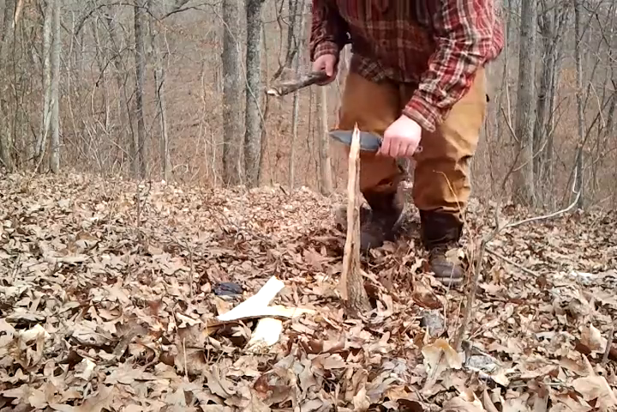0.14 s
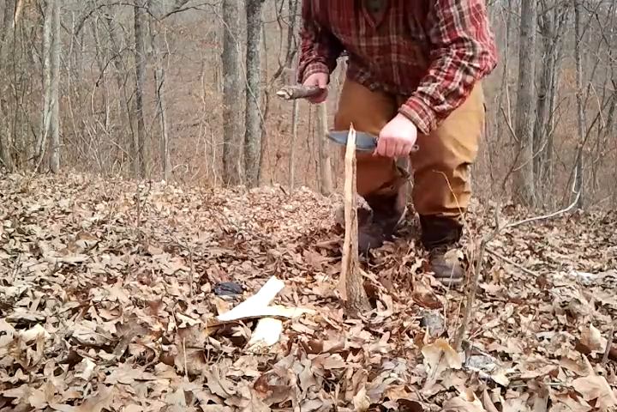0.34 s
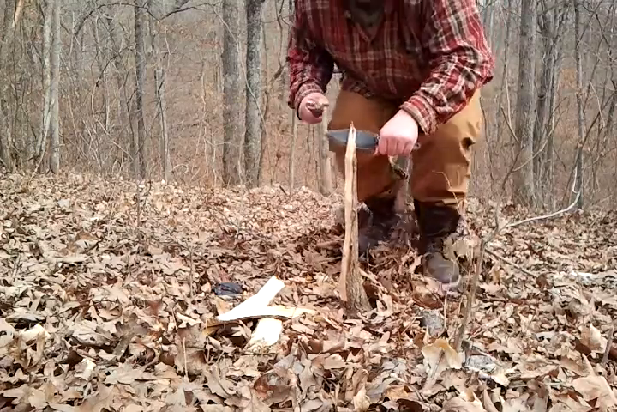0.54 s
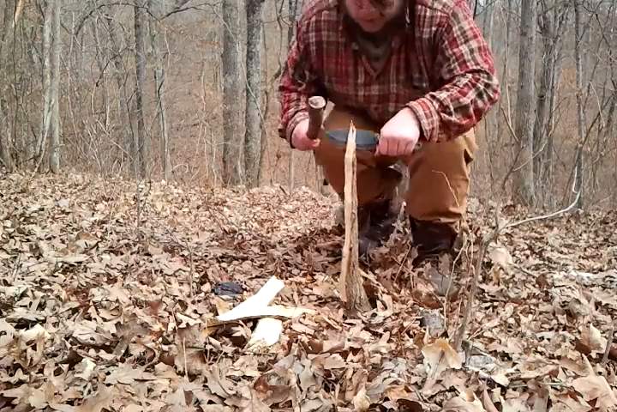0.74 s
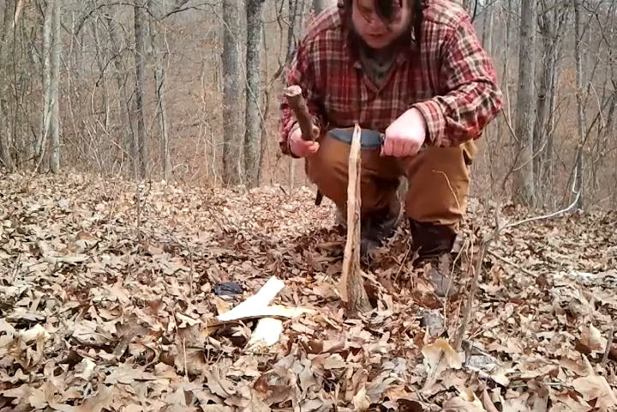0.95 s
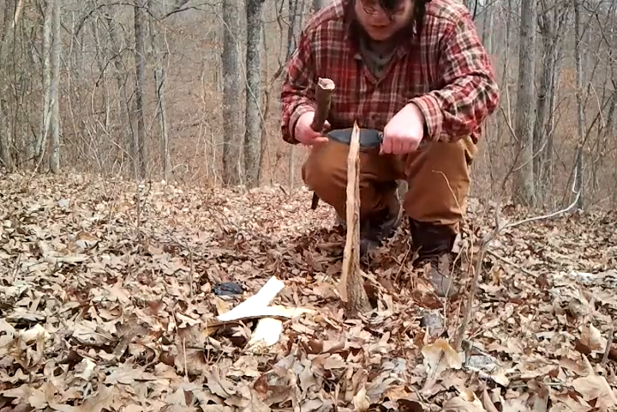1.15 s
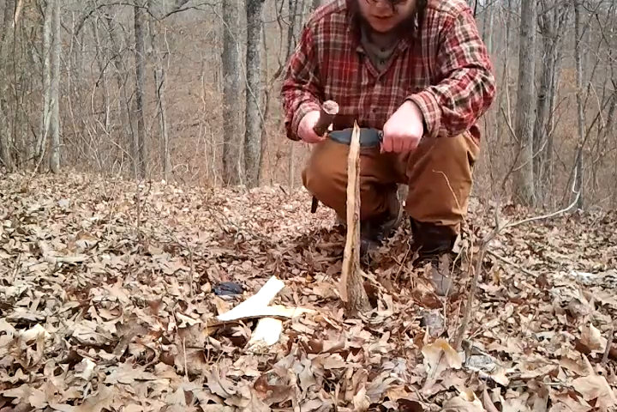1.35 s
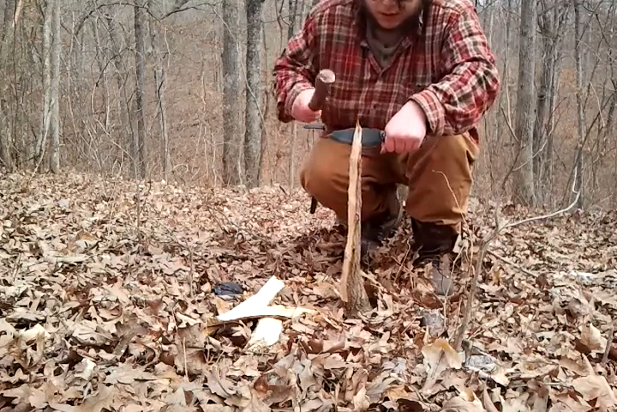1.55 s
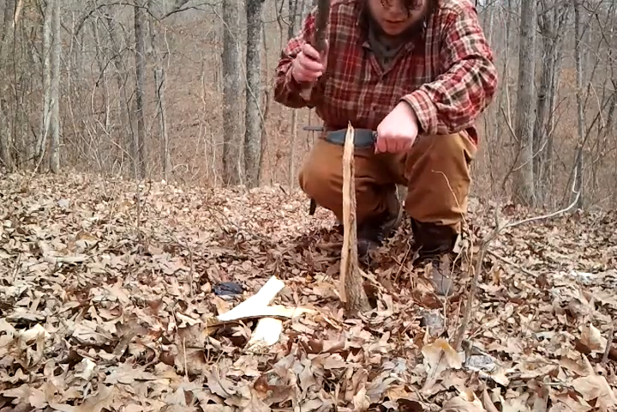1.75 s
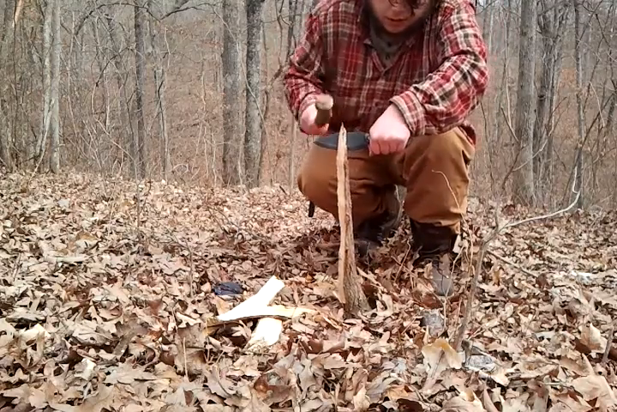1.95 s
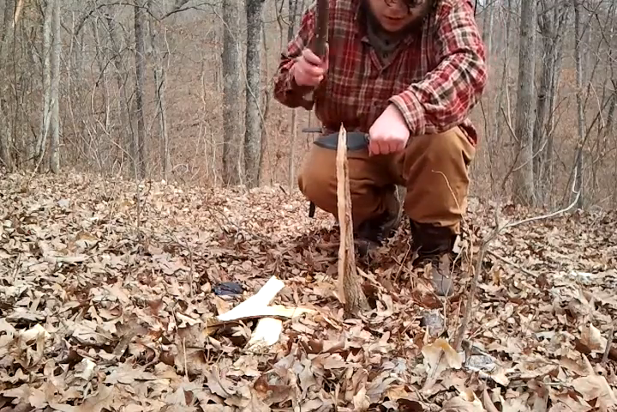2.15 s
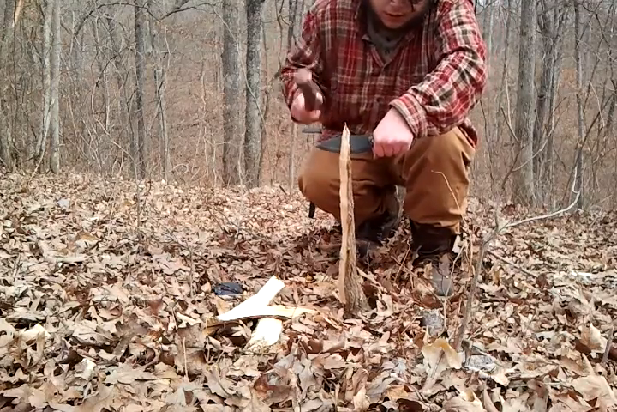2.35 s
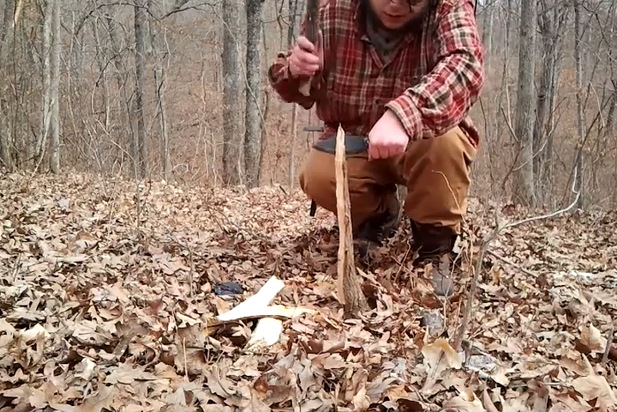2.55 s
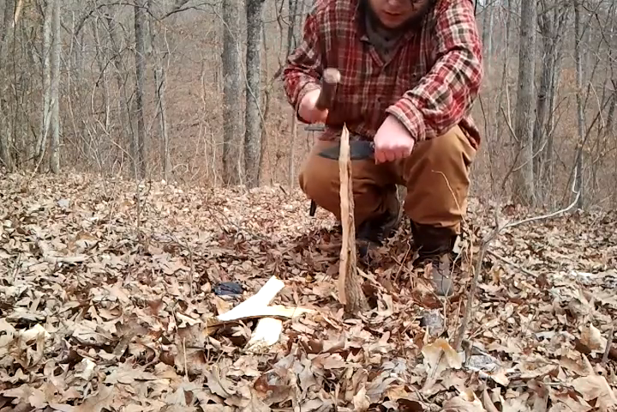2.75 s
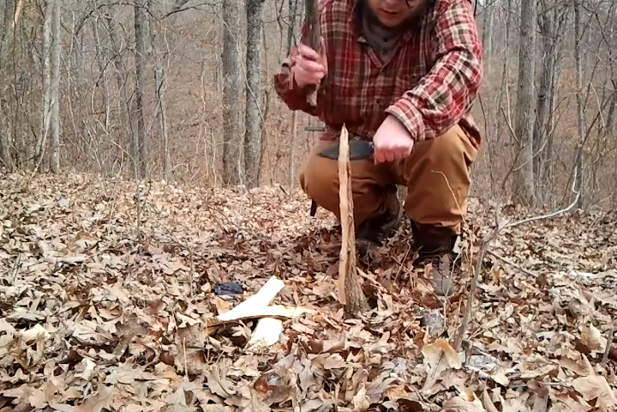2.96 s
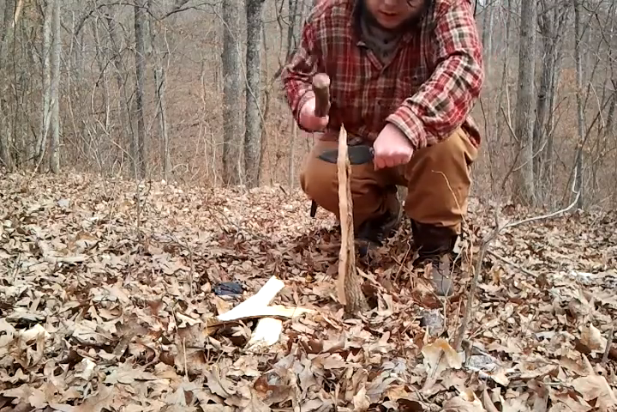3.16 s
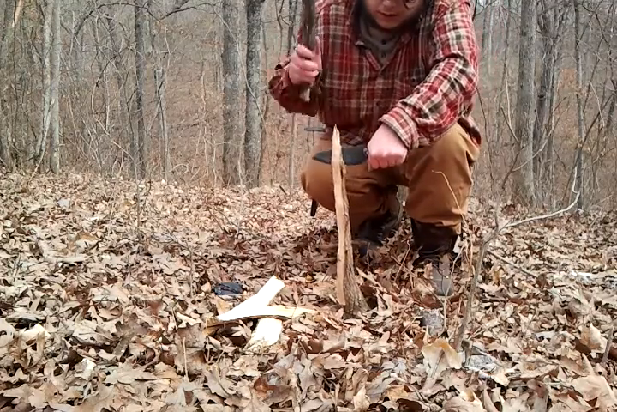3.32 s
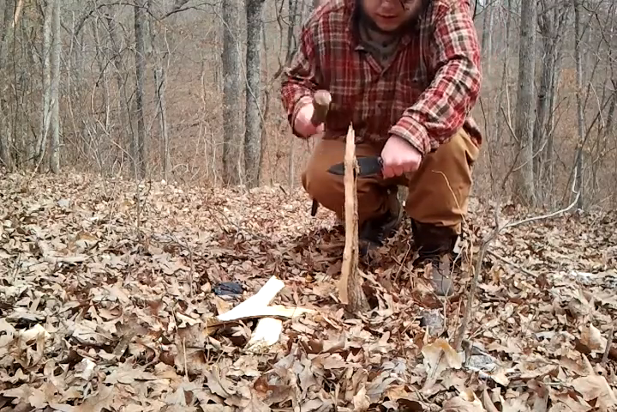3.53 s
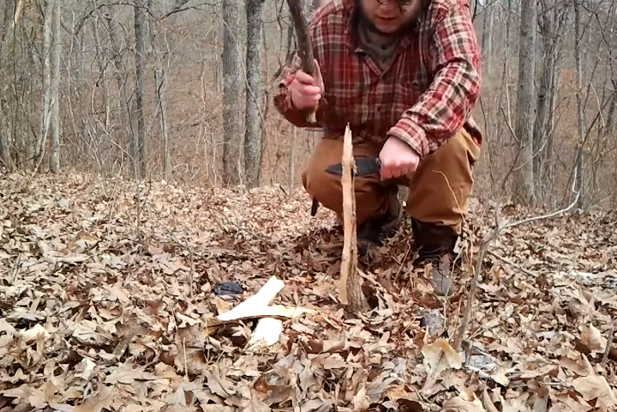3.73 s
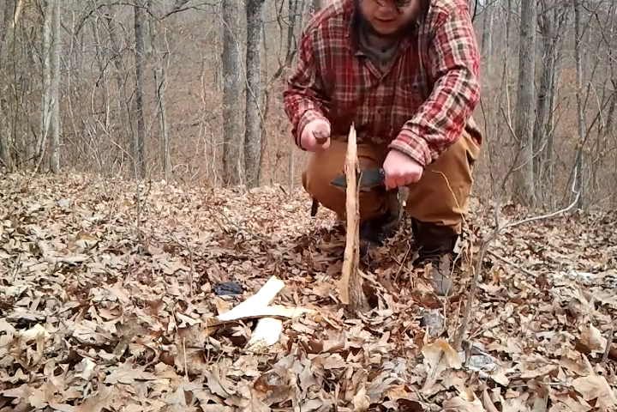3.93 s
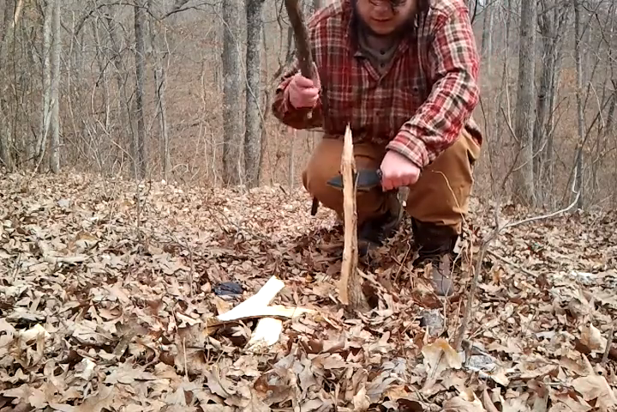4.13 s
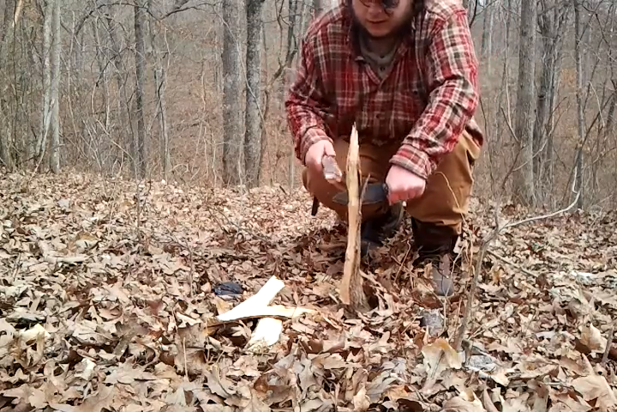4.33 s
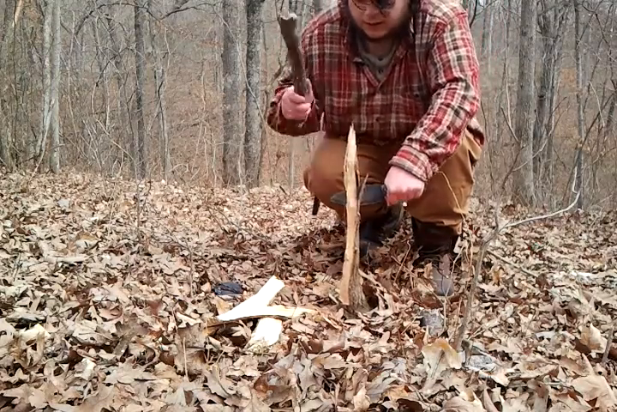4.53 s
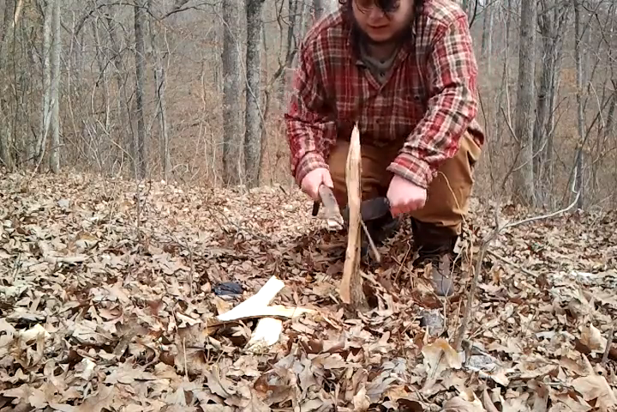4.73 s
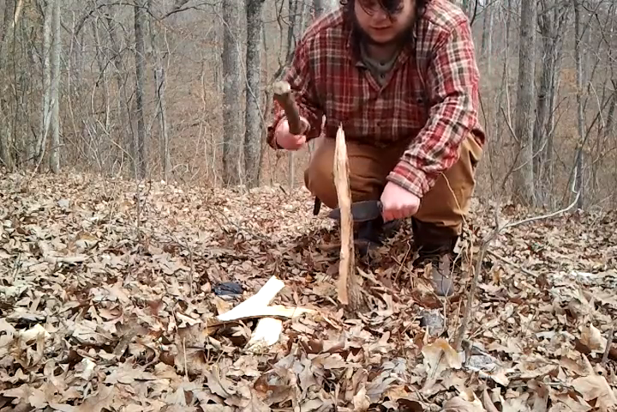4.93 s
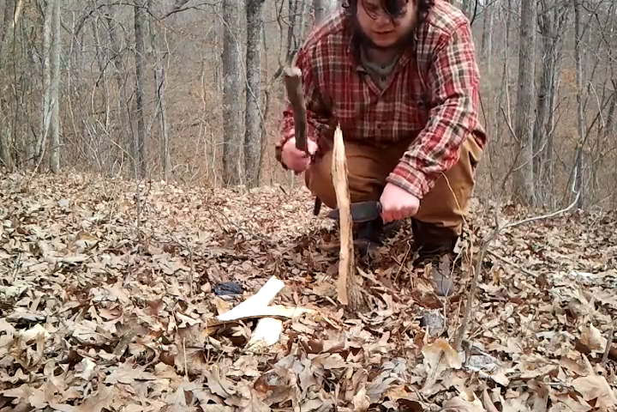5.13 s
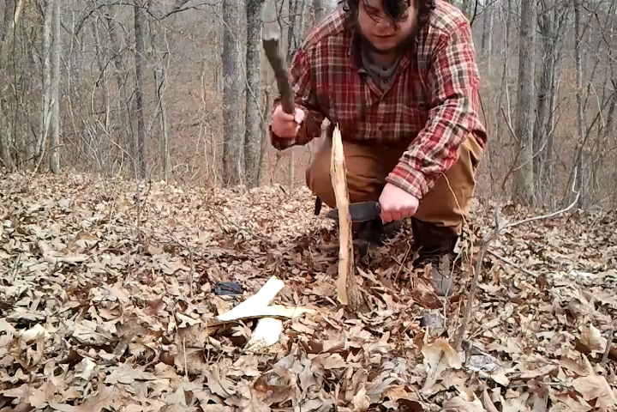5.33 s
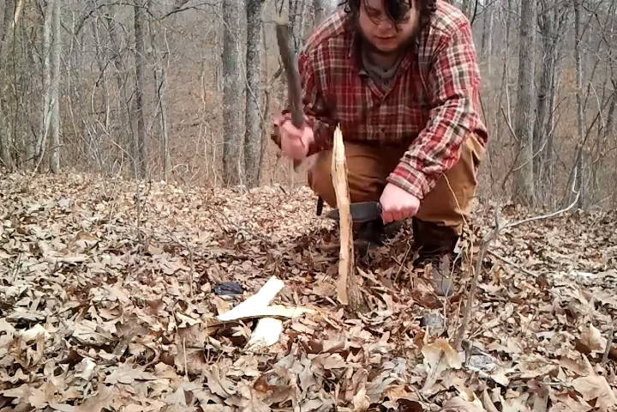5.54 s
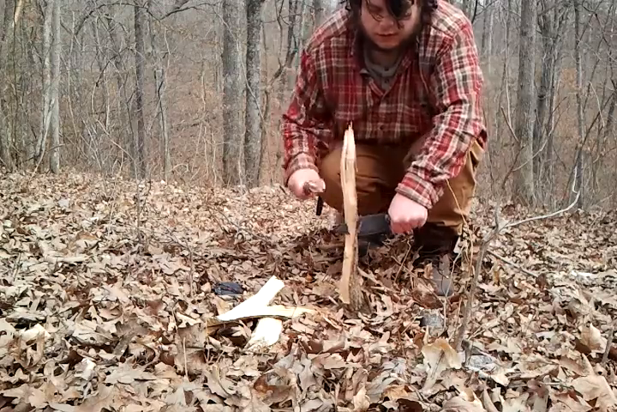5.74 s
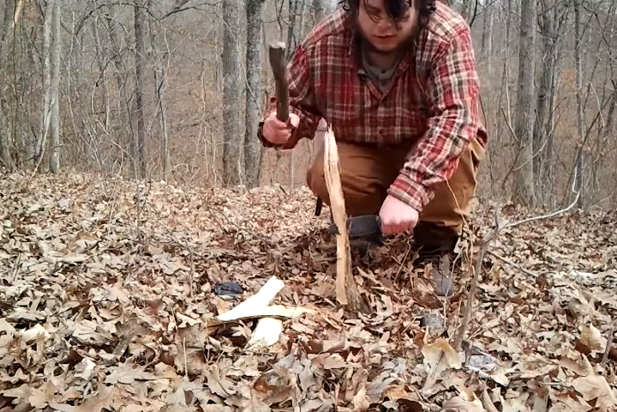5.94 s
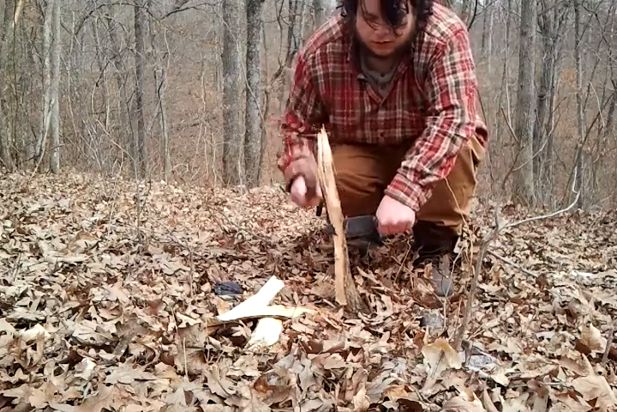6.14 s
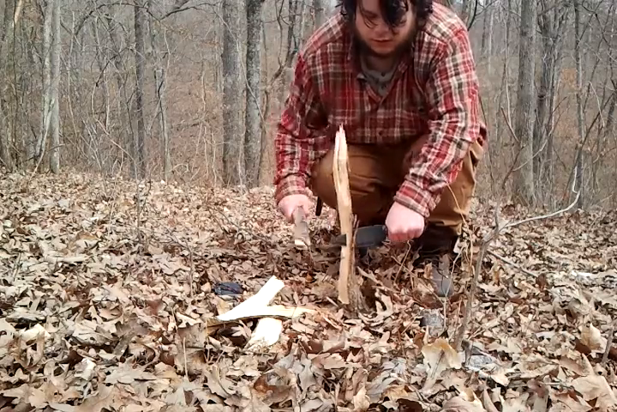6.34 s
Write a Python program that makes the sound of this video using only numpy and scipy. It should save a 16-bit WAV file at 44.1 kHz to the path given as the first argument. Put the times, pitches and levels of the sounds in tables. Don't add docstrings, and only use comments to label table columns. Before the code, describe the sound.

Brittle leaves rustle and snap underfoot, followed by loud, clipped woody knocks at a steady pace, the last ones slower, bouncing and softer.

```python
import sys
import numpy as np
from scipy import signal
from scipy.io import wavfile
from scipy.ndimage import uniform_filter1d, minimum_filter1d

SR = 44100
rng = np.random.default_rng(int(sys.argv[2]) if len(sys.argv) > 2 else 0)


def digitize_waveform(pressure):
    field = np.atleast_2d(pressure).T
    bounded = np.clip(field, -1, 1)
    quanta = np.round(bounded * 32767).astype(np.int16)
    wavfile.write(sys.argv[1], SR, quanta)


def undo_db(level):
    steps = np.asarray(level, float) / 20
    return 10 ** steps


N = 285768


def evened(x):
    return x / np.sqrt(np.mean(x ** 2) + 1e-20)


def read(points, hz):
    f, value = np.transpose(points)
    return np.interp(np.log(hz + 1), np.log(f + 1), value)


def add(mix, start_s, sound):
    part = mix[round(start_s * SR):][:len(sound)]
    part += sound[:len(part)]


def passed(x, kind, hz, order=2):
    return signal.sosfilt(signal.butter(order, hz, kind, fs=SR, output="sos"), x)


def swell(start_s, level_db, rise_db_per_s, fall_db_per_s, until_s=None):
    t = np.arange(N) / SR
    early = np.maximum(start_s - t, 0)
    late = np.maximum(t - (until_s or start_s), 0)
    return undo_db(level_db - rise_db_per_s * early - fall_db_per_s * late)


def random_signs():
    return rng.choice([-1., 1.], N)


# pitch_hz [Hz], level_db [dB per Hz]
HUSH_COLOUR = [(120, -40.5), (200, -9), (310, -5.5), (341, -6.5), (428, -6.5), (472, -10.5), (537, -4.5),
               (2800, -12.5), (3520, -12.5), (5360, -10), (7900, -20.5), (9600, -67), (12500, -87),
               (21100, -120)]
# start_s [s], level_db [dB]
FOOT_PUFFS = [
    (.07, -65),
    (.25, -63),
    (0.849, -48.5),
    (1.01, -76),
    (1.22, -61),
    (1.31, -57),
    (1.55, -71),
]


def air():
    frames, hz = N // 256 + 5, np.fft.rfftfreq(1024, 1 / SR)
    a, b, patches = rng.standard_normal((frames, 513, 3)).T
    patches = evened(uniform_filter1d(uniform_filter1d(patches, 20, 0), 10, 1))
    spectrum = (a + 1j * b) * undo_db(read(HUSH_COLOUR, hz)[:, None] + 1.37 * patches)
    hush = signal.istft(spectrum, nperseg=1024, noverlap=768)[1][:N]

    lumps = undo_db(2.0 * evened(passed(rng.standard_normal(N), "low", 14)))
    breeze = evened(lumps * passed(passed(rng.standard_normal(N), "low", 130), "high", 62))
    gusts = undo_db(-65.5) + sum(swell(start_s, level_db, 345, 176.5) for start_s, level_db in FOOT_PUFFS)

    drone_hz, drone_width_hz = 163, 19
    drone_band = [drone_hz - drone_width_hz / 2, drone_hz + drone_width_hz / 2]
    drone = evened(passed(rng.standard_normal(N), "band", drone_band))
    passing = swell(4.36, -67.5, 85, 147, until_s=5.8)
    return undo_db(-57) * evened(hush) + gusts * breeze + passing * drone


def settling():
    ticks_per_s, level_db = 250, -57
    size = undo_db(3.3 * np.minimum(rng.exponential(1, N), 4)) * (rng.random(N) < ticks_per_s / SR)
    return undo_db(level_db) * evened(passed(size * random_signs(), "high", 6900))


def pops():
    pops_per_s, pop_s, level_db = 130, 0.0017, -1
    size = undo_db(4.5 * np.minimum(rng.exponential(1, N), 3)) * (rng.random(N) < pops_per_s / SR)
    fade = np.exp(-np.arange(600) / (pop_s * SR))
    bursts = signal.oaconvolve(size, fade)[:N] * rng.standard_normal(N)
    return undo_db(level_db) * evened(passed(bursts, "high", 2600))


# start_s [s, most weight], level_db [dB], rise_db_per_s [dB/s],
# fall_db_per_s [dB/s], crunch_db [dB]
STEPS = [
    (.118, -21.5, 10, 111, -14),
    (.266, -17.5, 66.5, 336, -12),
    (0.699, -26, 160, 96, -10),
    (.838, -21, 113, 370, -9),
    (.994, -37.5, 121, 62, -12.5),
    (1.57, -40, 400, 500, -17),
    (5.082, -34, 165, 600, -8),
]


def leaves():
    crackles_per_s, clumpy_db, hiss = 4000, 2.0, 0.98
    ticks = (rng.random(N) < crackles_per_s / SR) * random_signs()
    clumps = undo_db(clumpy_db * evened(passed(rng.standard_normal(N), "band", [25, 120], order=1)))
    broken = evened(clumps * (evened(ticks) + hiss * rng.standard_normal(N)))
    crunch = passed(broken, "low", 780, order=1)
    crackle = passed(broken, "high", 3090, order=1)

    press = np.array([swell(*step[:4]) for step in STEPS])
    ease = np.array([swell(start_s, level_db - 22, rise, 23.5) for start_s, level_db, rise, *_ in STEPS])
    low = np.vstack([press * undo_db(np.array(STEPS)[:, 4:]), ease * undo_db(-2.5)])
    crackle_gain = np.linalg.norm(np.vstack([press, ease]), axis=0)
    crunch_gain = 3.5 * np.linalg.norm(low, axis=0)
    return crackle_gain * crackle + crunch_gain * crunch + np.linalg.norm(ease, axis=0) * pops()


def rattle(length_s, chance, clumpy_db=1.5):
    t = np.arange(len(chance)) / SR
    u = t / length_s
    shape = np.minimum(t / 0.00092, 1) ** 2 * undo_db(-8 * u) / (1 + u ** 4)
    clumps = evened(uniform_filter1d(chance[:, 1], 30))
    return shape * chance[:, 0] * undo_db(clumpy_db * clumps)


# start_s [s], level_db [dB, peak], length_s [s]
LEAF_SNAPS = [(0.3505, -18.5, 0.0033), (.3785, -26, 0.0025), (0.487, -26, 0.0049), (0.518, -23, 0.0025),
              (0.5465, -20, 0.003), (0.556, -22, 0.0024), (0.594, -13.5, 0.0049), (.9607, -20, 0.0049),
              (.984, -23, 0.0022), (0.999, -24, .0026), (1.0246, -24, 0.0024), (1.087, -26, 0.0039),
              (1.143, -26.5, 0.0038), (1.246, -30.5, 0.0051), (1.295, -31.5, 0.007), (1.339, -29.5, 0.0033),
              (1.394, -24, 0.0034), (1.4205, -31, 0.0029), (1.456, -32, .0018), (1.501, -28, .0021),
              (1.5445, -29, 0.0025), (1.553, -31.5, 0.0028), (1.635, -28.5, 0.0018), (1.7285, -36, .0017)]
# start_s [s], level_db [dB, peak], length_s [s]
FIBRE_TEARS = [(2.689, -26, 0.0013), (2.798, -32, 0.0052), (3.224, -31.5, .0027), (3.442, -29, 0.0017),
               (3.9884, -23.5, 0.0037), (4.026, -38, .0029), (4.357, -42, 0.0016), (5.075, -29.5, .0012),
               (5.229, -37, .0022), (5.372, -38, 0.0039), (5.735, -28.5, 0.0051), (5.776, -40, .0026),
               (5.981, -30, 0.002), (6.0173, -19.5, 0.0089), (6.203, -34, 0.0032), (6.343, -33.5, 0.0013)]


def snaps():
    out, rows = np.zeros(N), LEAF_SNAPS + FIBRE_TEARS
    for (start_s, level_db, length_s), chance in zip(rows, rng.standard_normal((len(rows), 800, 2))):
        pitch_hz = 5200 * (1 + 0.05 * chance[0, 0])
        snap = passed(rattle(length_s, chance), "band", [0.58 * pitch_hz, 2.76 * pitch_hz])
        add(out, start_s - .0006, undo_db(level_db - 1.5) * snap / abs(snap).max())
    return out


def ring(pitch_hz, level_db, t60_s):
    t = np.arange(6000) / SR
    return undo_db(level_db - 60 * t / t60_s) * np.sin(2 * np.pi * pitch_hz * t)


# start_s [s], level_db [dB, peak], stick_hz [Hz], stick_db [dB], log_db [dB]
BLOWS = [
    (2.1, -4, 1342, -9, -11),
    (2.482, -2, 1803, -12, -18),
    (2.87, -1.5, 1500, -10, -13.5),
    (3.264, -3, 1560, -5.5, -10.5),
    (3.655, 0.5, 1553, -11.5, -11.5),
    (4.062, -2, 1555, -3, -9),
    (4.493, -4, 1570, -3, -11.5),
    (4.939, -2.5, 1587, -3, -4),
    (5.847, -8, 1620, 2, -14),
    (6.414, -10.5, 1510, -2.5, -6.5),
]
# start_s [s], level_db [dB], length_s [s], wood_db [dB]
TOUCHES = [(4.488, -7, 0.0082, -11.5), (4.9327, -5, 0.0037, -15.5), (5.8389, -15.5, 0.0064, -7.5),
           (5.8404, -8, 0.0036, -25), (5.8445, -11.5, 0.014, -5), (6.407, -33, 0.0035, 4.5),
           (6.4104, -16.5, 0.0034, -3.5), (6.4118, -13, 0.006, -17), (6.4237, -9, 0.0063, -8),
           (6.4272, -22, .0012, -12), (2.488, -14.5, 0.0023, -21), (3.662, -7, 0.0035, -8),
           (4.0712, -11, 0.0048, -1), (2.885, -12, 0.0044, -31)]
# pitch_hz [Hz], level_db [dB], t60_s [s]
LOG_RINGS = [(2512, -5, 0.025), (3297, -2, 0.0089), (3810, -9, 0.013)]
# pitch_hz [Hz], level_db [dB], t60_s [s]
LINGERING_RINGS = [
    (1570, -24, .06),
    (2560, -28, .055),
]


def blows():
    near, opening, click = np.zeros((3, N))
    overdrive_db, rattle_s = 8, 0.0078
    rows = [(start_s + .0007, level_db + overdrive_db, rattle_s, *wood) for start_s, level_db, *wood in BLOWS]
    rows += [(start_s, level_db, length_s, 1580, wood_db, wood_db + 3.5)
             for start_s, level_db, length_s, wood_db in TOUCHES]
    first = 4.95 * (np.arange(6000) == 12)
    first_click = first + 0.66 * passed(first, "band", [1200, 2900], order=1)
    stick_linger, log_linger = [ring(*row) for row in LINGERING_RINGS]
    chances = rng.standard_normal((len(rows), 1500, 3))
    for (start_s, level_db, length_s, stick_hz, stick_db, log_db), chance in zip(rows, chances):
        gain = undo_db(level_db)
        crack = rattle(length_s, chance)
        push = 0.058 * rattle(0.75 * length_s, chance[:, ::-1])
        push[12] = 1
        log = sum(ring(hz * (1 + chance[k, 2] / 100), db, t60_s)
                  for k, (hz, db, t60_s) in enumerate(LOG_RINGS))
        modes = ring(stick_hz, stick_db, 0.021) + undo_db(log_db) * log
        add(near, start_s, gain * signal.fftconvolve(push, modes))
        add(near, start_s, gain * (0.67 * crack + 0.091 * passed(crack, "band", [1200, 2900])))
        short_crack = rattle(0.0035, chance, clumpy_db=-0.5)[:300]
        add(opening, start_s, gain * evened(short_crack) * 0.44)
        add(click, start_s, gain * (first_click + 0.13 * modes))
        linger = stick_linger * undo_db(stick_db) + log_linger * undo_db(min(log_db, -8.5) + 20.5)
        add(click, start_s, gain * linger)
    return near, opening, click


# knock_db [dB, peak], low_hz [Hz], upper_hz [Hz], upper_db [dB],
# thud_db [dB]
LOG_KNOCKS = [
    (-21, 550, 890, 3.5, -37),
    (-23.5, 580, 970, 1, -41),
    (-17, 550, 1050, -2.5, -47),
    (-17.5, 475, 980, -1, -38.5),
    (-17, 504, 825, -3.5, -44.5),
    (-16, 515, 900, 1.5, -45),
    (-23, 690, 760, 8, -48),
    (-16.5, 440, 840, -1, -52),
    (-15.5, 514, 826, -1.5, -60),
    (-16.5, 547, 886, -1, -59),
]


def thuds():
    knock, soil = np.zeros((2, N))
    for (start_s, *_), (knock_db, low_hz, upper_hz, upper_db, thud_db) in zip(BLOWS, LOG_KNOCKS):
        modes = ring(low_hz, 0, 0.033) + ring(upper_hz, upper_db, 0.032)
        modes += ring(311, -15, 0.05)
        add(knock, start_s + 0.00124, undo_db(knock_db + 11.5) * modes)
        add(soil, start_s, ring(77, thud_db + 3.5, 0.2) * signal.windows.tukey(6000, .15))
    return knock, soil


# delay_s [s], level_db [dB], centre_hz [Hz], width_hz [Hz]
ECHOES = [
    (0.0101, -21, 4980, 3040),
    (0.0184, -17, 5130, 900),
    (.0300, -22.5, 3000, 5080),
    (.042, -28, 3500, 4500),
]


def echoes(x):
    out = np.zeros(N)
    for delay_s, level_db, centre_hz, width_hz in ECHOES:
        band = [max(centre_hz - width_hz / 2, 300), centre_hz + width_hz / 2]
        add(out, delay_s, undo_db(level_db) * passed(x, "band", band, order=1))
    return out


# pitch_hz [Hz], t60_s [s]
TRUNK_FADE = [(300, 0.33), (1500, 0.75), (3000, 0.61), (5000, 0.49), (8000, 0.39)]


def forest(x):
    taps = np.zeros(SR)
    at = np.arange(500, SR - 20, 10)
    at = at + rng.integers(0, 10, len(at))
    taps[at] = rng.choice([-1., 1.], at.shape) * undo_db(4.5 * rng.standard_normal(at.shape))
    hz, t, z = signal.stft(taps, SR, nperseg=256)
    fade = undo_db(-60 * t / read(TRUNK_FADE, hz)[:, None])
    tail = signal.istft(z * fade, SR, nperseg=256)[1]
    return undo_db(-18) * signal.fftconvolve(x, tail / np.linalg.norm(tail))[:N]


# pitch_hz [Hz], level_db [dB]
MICROPHONE_CURVE = [(59, -38), (100, -33.5), (300, -25), (970, -18), (2470, -11.5), (3600, -14),
                    (4400, -8.5), (4750, -2), (5200, -0.5), (5700, -8.5), (6430, -15.5), (7500, -13.5),
                    (8730, -34), (9600, -78)]


def microphone(x):
    hz = abs(np.fft.fftfreq(8192, 1 / SR))
    log_gain = np.log(undo_db(np.maximum(read(MICROPHONE_CURVE, hz), -100)))
    taps = np.fft.ifft(np.exp(log_gain - 1j * signal.hilbert(log_gain).imag)).real[:4096]
    return signal.oaconvolve(x, taps / np.linalg.norm(taps))[:N]


def scene():
    near, opening, click = blows()
    knock, soil = thuds()
    snapping, rustle = snaps(), leaves()
    far_rustle = passed(rustle, "low", 3000, order=1)
    scattered = forest(click + 0.38 * knock + undo_db(6.0) * snapping + undo_db(3.0) * far_rustle)
    heard = near + knock + snapping + rustle + settling() + echoes(opening) + scattered
    return (microphone(heard) + soil + air())[None]


def low_pass(x):
    return signal.sosfilt(signal.butter(12, 16570, fs=SR, output="sos"), x)


def record(dry):
    ceiling, headroom = .73, 1.36
    crest = -minimum_filter1d(-abs(dry), 24)
    gain = uniform_filter1d(np.minimum(headroom * ceiling / (crest + 1e-9), 1), 24)
    clipped = np.clip(dry * gain, -ceiling, ceiling)
    return low_pass(passed(clipped, "low", 16100, order=10))


dry = scene()
out = record(dry)
digitize_waveform(out)
```